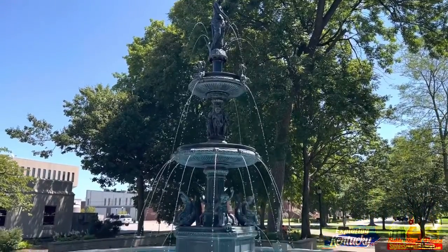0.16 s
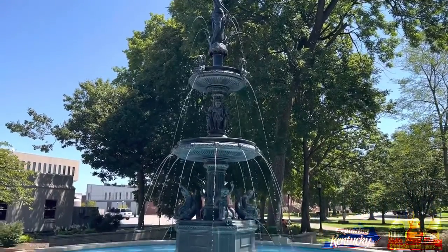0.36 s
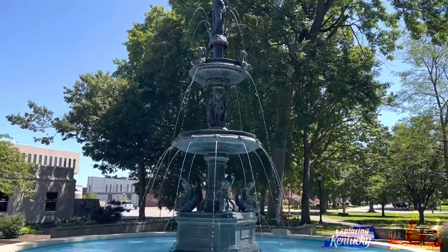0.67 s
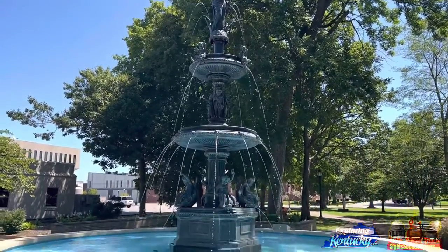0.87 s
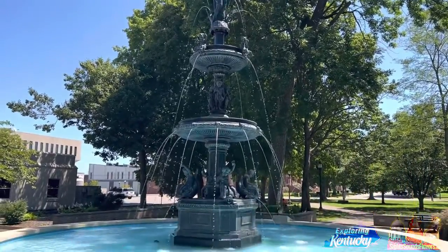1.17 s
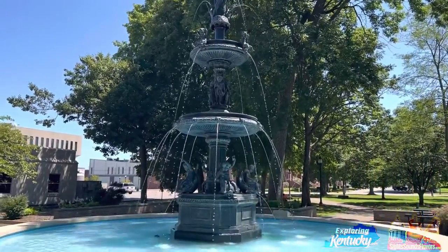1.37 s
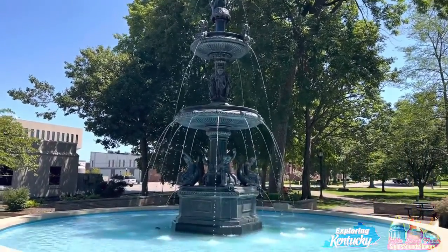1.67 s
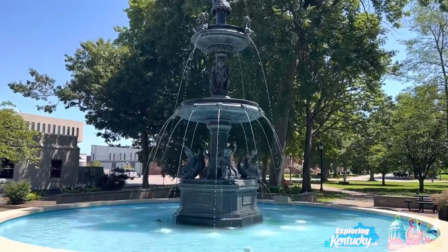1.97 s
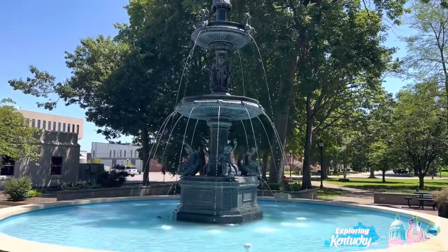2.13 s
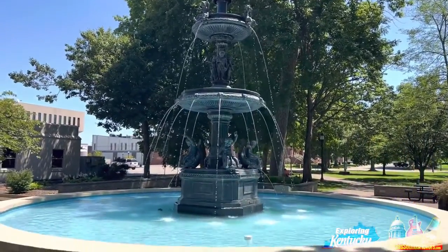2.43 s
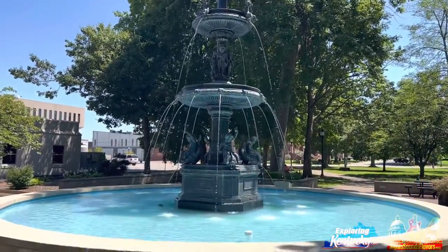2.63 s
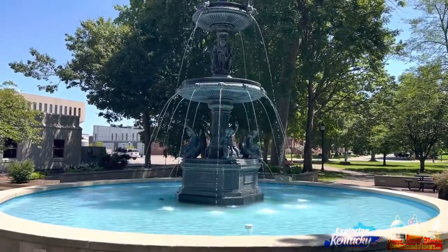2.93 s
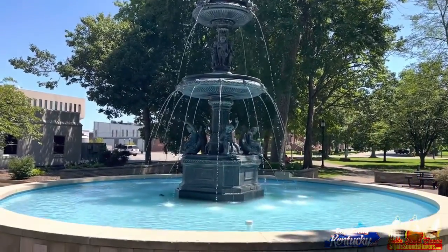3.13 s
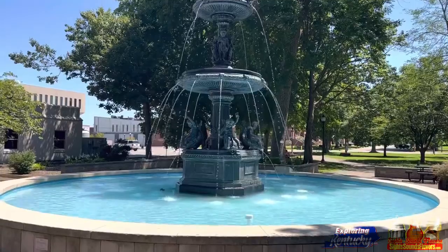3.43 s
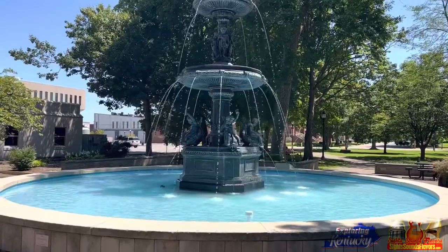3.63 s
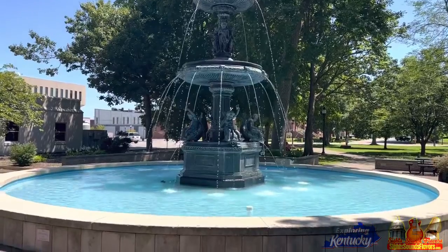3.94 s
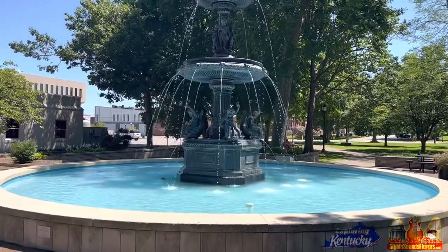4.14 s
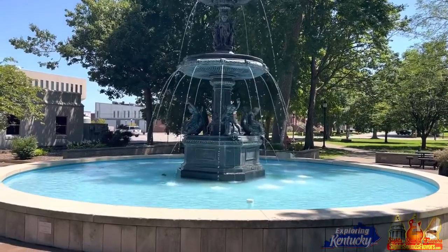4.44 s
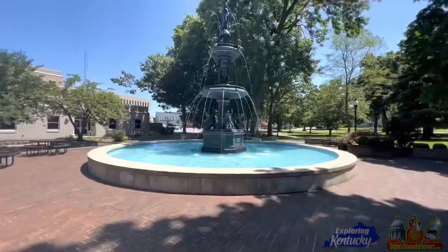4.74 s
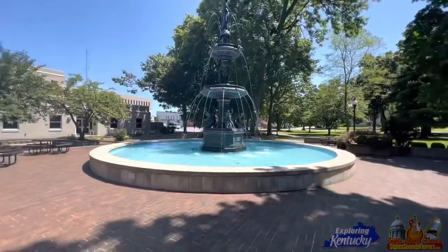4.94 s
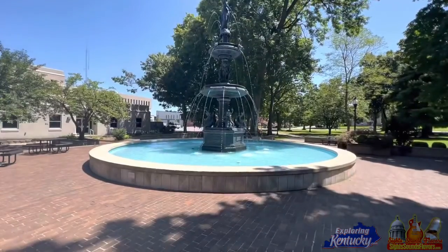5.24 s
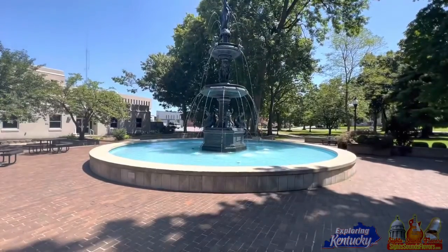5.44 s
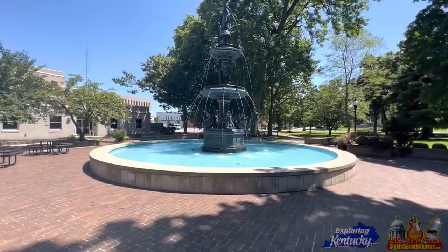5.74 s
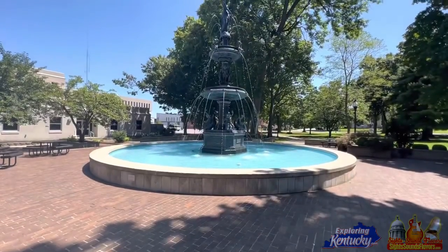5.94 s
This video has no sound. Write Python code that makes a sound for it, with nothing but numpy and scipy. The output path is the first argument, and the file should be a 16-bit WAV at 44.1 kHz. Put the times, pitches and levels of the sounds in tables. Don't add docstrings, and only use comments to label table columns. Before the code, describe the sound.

From 0 seconds a tiered fountain in an open park splashes steadily, heard in stereo a few steps from the pool. Thin jets break into countless drops, making a grainy, fluctuating hiss and patter with drifting fine spray. Nearer drops stand out: bright spits near 0.1 and 0.2, a tick around 0.5, then plops and ticks clustered from 0.8 to 1.4. More plops come near 1.7 and 2.5, a deeper one at 3.3, and a busy run from 3.7 to 4.2 ending in a sharp splash. Far underneath, low road rumble and a stumbling engine idle, clearest around 1 second, stay quiet. At about 4.6 the position shifts quickly further back over paving: the splash is more diffuse, its ground reflection stronger and duller, swelling slightly near 5.4, where a tiny high bubble whistles for an instant. Small ticks crowd the end, around 5.9 to 6.05.

```python
import sys
import numpy as np
from scipy import signal
from scipy.fft import rfft, irfft, next_fast_len
from scipy.io import wavfile
from scipy.ndimage import uniform_filter1d, map_coordinates

SR = 44100
rng = np.random.default_rng(int(sys.argv[2]) if len(sys.argv) > 2 else 0)


def generate_wav(sig):
    pcm = np.round(np.clip(np.atleast_2d(sig).T, -1, 1) * 32767).astype(np.int16)
    wavfile.write(sys.argv[1], SR, pcm)


def voltage_ratio(decibels):
    exponent = np.asarray(decibels, float) / 20
    return 10 ** exponent


N = 269010
TIME = np.arange(N) / SR


def unit(x):
    return x / np.sqrt(np.mean(x ** 2, axis=-1, keepdims=True) + 1e-20)


def along(hz, points, column=1):
    rows = np.transpose(points)
    return np.interp(np.log(hz + 1), np.log(rows[0] + 1), rows[column])


def curves(rows):
    s, *columns = np.transpose(rows)
    return [np.interp(TIME, s, column) for column in columns]


def wobble(rate):
    knots = rng.standard_normal(int(N * rate / SR) + 4)
    return map_coordinates(knots, [np.arange(N) * rate / SR])


def bumps(times, rise_s, fall_s):
    t = TIME - np.asarray(times)[:, None]
    return np.exp(-(t / np.where(t < 0, rise_s, fall_s)) ** 2)


def filtered(x, response):
    m = next_fast_len(N + 8192)
    hz = np.fft.rfftfreq(m, 1 / SR)
    return irfft(rfft(x, m) * response(hz), m)[..., :N]


def bubbles(s, db, hz, cycles, rise):
    length = 320
    turns = np.arange(length) / SR * hz[:, None]
    life = turns / cycles[:, None]
    attack = np.minimum(3 * turns, 1)
    fade = np.cos(np.linspace(0, np.pi / 2, length))
    ring = np.sin(2 * np.pi * turns * (1 + rise * life / 2))
    shape = -attack * np.exp(-life) * fade * ring
    at = np.round(s * SR).astype(int)[:, None] + np.arange(length)
    return np.bincount(at.ravel(), (voltage_ratio(db)[:, None] * shape).ravel(), N + length)[:N]


def patter(surge, spread_db, drops_db, count):
    s, pitch, size, life = rng.random((count, 4)).T
    crowd = np.cumsum(voltage_ratio(2.8 * surge))
    s = np.interp(s, crowd / crowd[-1], TIME)
    hz = 450 * 33 ** pitch
    db = -spread_db * np.log(size + 0.061) + 16.8 * np.log10(hz / 1000)
    drops = bubbles(s, db, hz, 1.1 + 4.5 * life ** 2, rise=.12)
    z = signal.stft(rng.standard_normal(N), nperseg=256)[2]
    grain = uniform_filter1d(rng.standard_normal(z.shape), 5, 0)
    grain = uniform_filter1d(grain, 6, 1)
    hiss = signal.istft(z * voltage_ratio(2.05 * grain / grain.std()), nperseg=256)[1][:N]
    return unit(voltage_ratio(0.56 * surge) * unit(hiss) + voltage_ratio(drops_db) * unit(drops))


def bounce(hz, delay, gain, turn, dull_hz):
    echo = gain / (1 + (hz / dull_hz) ** 2) * np.exp(-1j * (2 * np.pi * hz * delay - turn))
    return (1 + echo) / np.sqrt(1 + abs(echo) ** 2)


def ahead(hz, lead):
    first_hz, every_hz, width_hz = 9350, 1800, 700
    flips = sum(np.clip((hz - first_hz - k * every_hz) / width_hz + .5, 0, 1) for k in range(4))
    return np.interp(hz, *np.transpose(lead)) + np.pi * flips


def heard(axis, flanks, colour, alike, phases, ground):
    def tone(hz):
        ports_db = [along(hz, colour, column=1), along(hz, colour, column=2)]
        return voltage_ratio(ports_db) * hz ** 2 / (hz ** 2 + 190 ** 2)

    def share(hz):
        return np.clip(along(hz, alike), 0, 1)

    def axis_path(hz):
        lead = np.exp(.5j * np.outer([-1, 1], ahead(hz, phases)))
        return tone(hz) * np.sqrt(share(hz)) * lead * bounce(hz, *ground[0])

    def flank_path(hz):
        return tone(hz) * np.sqrt(1 - share(hz)) * bounce(hz, *ground[1])

    return filtered(axis, axis_path) + filtered(flanks, flank_path)


# frequency in Hz, left level in dB, right level in dB.
NEAR_COLOUR = [(186, -4.5, -14.5), (312, -3, -2.5), (630, -1.1, -3), (1230, -1.65, -4), (2200, -2.5, -2.5),
               (2910, -6, -10.5), (3830, -10.5, -10), (4560, -12.5, -16), (5860, -12, -21),
               (7400, -16.5, -21), (8400, -16.5, -18), (11470, -18.5, -18), (12900, -24.5, -26.5),
               (15800, -28, -25.5)]
# frequency in Hz, share of power from the axis [0 to 1].
NEAR_SHARE = [(300, 0.93), (1500, 0.87), (2800, 0.59), (4000, 0.49), (5500, 0.22), (7300, 0.15),
              (8400, 0.9), (9200, 0.61), (9900, 1), (12500, 0.5), (13800, 0.73), (16000, .88)]
# frequency in Hz, phase in radians.
NEAR_LEAD = [(0, 0), (2000, 0), (2750, -1.6), (3200, .3), (4000, -.5), (5300, 1.1), (7200, 0), (8000, -.2)]
# delay in seconds, gain as a ratio (or one per port), turn in radians, dull above Hz.
NEAR_ECHO = [
    (.0021, .33, 2.7, 4000),
    (.00207, [[.5], [.15]], 4.93, 9000),
]


def water_near(axis, flanks):
    return heard(axis, flanks, NEAR_COLOUR, NEAR_SHARE, NEAR_LEAD, NEAR_ECHO)


# frequency in Hz, left level in dB, right level in dB.
FAR_COLOUR = [(200, 2, 0.5), (340, 1.5, -5), (556, -3, -4), (1010, 0.7, -3.5), (1970, 0, -3),
              (2780, -2.5, -10), (3900, -7.0, -7), (4350, -9.5, -14), (6350, -10, -23.5), (7700, -11, -19),
              (8400, -15, -20), (11340, -18, -16), (13000, -24.5, -28), (15700, -33.0, -28)]
# frequency in Hz, share of power from the axis [0 to 1].
FAR_SHARE = [(500, 0.74), (1500, 0.46), (2800, 0.088), (4000, 0.45), (5200, 0.31), (6500, 0.31),
             (8500, 0.4), (10200, 0.8), (12000, 0.94), (13700, 0.27), (16000, .9)]
# frequency in Hz, phase in radians.
FAR_PHASE = [(0, 0), (2050, -.1), (2700, -1.2), (3500, -.6), (4050, -.2), (5100, -2.6), (6300, -1),
             (8000, 0)]
# delay in seconds, gain as a ratio, turn in radians, dull above Hz.
FAR_ECHO = [
    (.00194, .88, 1.25, 2100),
    (.00194, .45, 1.25, 1800),
]


def water_far(axis, flanks):
    return heard(axis, flanks, FAR_COLOUR, FAR_SHARE, FAR_PHASE, FAR_ECHO)


# time in seconds, level in dB.
WATER_FLOW = [
    (0, -36),
    (.8, -35.5),
    (2.2, -35.5),
    (3.5, -36),
    (3.9, -35.5),
    (4.5, -35.5),
    (5.4, -34),
    (6.1, -35.5),
]
# time in seconds, swell in dB.
SLUGS = [(.76, 1.5), (1.03, 1.5), (1.19, 0.5), (1.25, 0.5), (2.05, 1.5), (2.41, 1), (2.51, 0.5), (2.6, 0),
         (3.19, 2.5), (3.69, 1.5), (3.92, 0), (4.195, 4), (4.66, 2.5), (4.76, 1.5), (4.88, 3.5),
         (5.16, 0.5), (5.46, 1), (5.83, 3), (5.91, 1.5), (6.04, 0.5)]


def fountain():
    surge = .4 * wobble(14) + .7 * wobble(32) + .5 * wobble(80)
    axis = patter(surge, spread_db=3.0, drops_db=-7.5, count=7000)
    flanks = np.array([patter(surge, spread_db=3.0, drops_db=-4.5, count=4000) * voltage_ratio(1.23 * wobble(35))
                       for port in "LR"])
    near, far = water_near(axis, flanks), water_far(axis, flanks)
    scene_change_s, change_s = 4.57, .1
    back = np.clip((TIME - scene_change_s) / change_s, 0, 1)
    water = (1 - back) * near / np.std(near) + back * far / np.std(far)
    mist = filtered(water, lambda hz: 1 / (1 + (12600 / (hz + 1)) ** 16))
    gusts = voltage_ratio(1.6 * wobble(7) + 1.8 * wobble(22) - .6)
    water = water + (gusts - 1) * mist
    s, swell_db = np.transpose(SLUGS)
    swells = swell_db @ bumps(s, rise_s=0.0071, fall_s=0.018)
    return voltage_ratio(curves(WATER_FLOW)[0] + swells + 2.5) * water


# time in seconds, rumble level in dB, idling engine level in dB.
DISTANT_LEVELS = [(0, -38.5, -47), (.6, -36, -52), (.8, -38.5, -38), (1.3, -36, -38), (2.2, -37.5, -41),
                  (2.6, -36.5, -41.5), (2.95, -38, -38.5), (3.25, -36, -52), (4.35, -37.5, -47),
                  (4.6, -37.5, -55), (5.5, -39, -49), (6.1, -39.5, -54)]
# frequency in Hz, level in dB per Hz.
ROAD_SPECTRUM = [(15, -56), (25, -26), (35, -8), (39, -20), (65, 1.5), (79, 0), (92, -7.5), (118, -2.5),
                 (165, -1), (194, -10.5), (281, -16.5), (309, -23), (330, -17.5), (430, -24), (730, -120)]
# multiple of the firing rate, level in dB.
ENGINE_ORDERS = [
    (1, -0.5),
    (2, -4),
    (3, -8),
]
STUMBLES = [.37, .52, .88, 1.38, 1.58, 2.19, 2.34, 2.49, 3.24, 3.76, 4.12, 4.5, 4.81, 5.43, 5.91]


def traffic():
    rumble_db, engine_db = curves(DISTANT_LEVELS)
    stumble_db, stumble_s = -14.5, 0.041
    engine_db = engine_db + stumble_db * bumps(STUMBLES, stumble_s, stumble_s).sum(axis=0)
    noise = filtered(rng.standard_normal((2, N)), lambda hz: voltage_ratio(along(hz, ROAD_SPECTRUM)))
    mid = noise[0]
    side = filtered(noise[1], lambda hz: 0.13 + 0.58 / (1 + (hz / 90) ** 4))
    road = voltage_ratio(rumble_db + 0.99 * wobble(6.12)) * unit(np.array([mid + side, mid - side]))
    firing_hz = 50 + 1.096 * wobble(3) + 1.186 * wobble(16)
    turns = np.cumsum(firing_hz) / SR
    engine = sum(voltage_ratio(db + 1.2 * wobble(16)) * np.sin(2 * np.pi * k * turns) for k, db in ENGINE_ORDERS)
    ports_db = np.array([[-.6], [.6]])
    return road + voltage_ratio(engine_db + 3.0 + ports_db) * engine


def splash(rows, cycles, spray_db, spray_s):
    s, db, hz, pan_db = np.transpose(rows)
    grains = 7
    jitter, tone = rng.random((len(s), 2, grains)).transpose(1, 0, 2)
    spray_at = (s[:, None] + spray_s * (jitter - .15)).ravel()
    spray_hz = (hz[:, None] * 1.96 ** (tone - .5)).ravel()
    ringing = cycles * (1500 / hz) ** 0.33
    ports = []
    for side in (.5, -.5):
        level = db + side * pan_db
        bubble = bubbles(s + .0006, level + 0.5, hz, ringing, rise=0.046)
        smack = bubbles(s + .0006, level - 1, 2.2 * hz, .7 + 0 * s, rise=0)
        puff_db = np.repeat(level + spray_db, grains)
        spray = bubbles(spray_at, puff_db, spray_hz, 1.37 + 0 * spray_at, rise=0.085)
        ports.append(smack + bubble + spray)
    return np.array(ports)


# time in seconds, peak in dB, bubble pitch in Hz, left over right in dB.
SPIT_DROPS = [(0.1104, -31, 6790, 5), (0.216, -27.5, 6190, 10), (1.7531, -32, 10500, 2.0),
              (2.7477, -28, 8250, 1.0), (3.6654, -37, 6780, 2.0), (3.9205, -28, 9000, 2),
              (3.9424, -31, 7290, 6), (4.2383, -36, 6150, 1.5), (4.9954, -29, 11100, 8),
              (5.196, -31, 12000, 2), (5.2354, -51.5, 6880, 5.0), (5.3254, -41, 6830, 7.0),
              (5.427, -31, 7120, 0), (5.7184, -32, 7230, 6.0)]


def spits():
    return splash(SPIT_DROPS, 3.5, spray_db=-3, spray_s=.007)


# time in seconds, peak in dB, bubble pitch in Hz, left over right in dB.
TICK_DROPS = [(0.169, -21.5, 2270, 2.0), (0.4654, -42, 2600, 7), (1.069, -24, 2720, 5),
              (1.2444, -21, 2370, 1.5), (1.3159, -17, 2250, 5), (2.5082, -21, 2640, 12),
              (3.7544, -20.5, 2410, 4), (3.921, -18, 2420, 1), (3.9275, -27, 2300, 2),
              (4.1864, -29, 2300, 1), (4.7491, -24, 3780, 6), (4.8439, -26, 2400, 15),
              (5.0704, -30, 2210, 5.5), (5.1382, -23, 2240, 5.0), (5.395, -38, 2520, 4.5),
              (5.8254, -35, 3490, 7), (5.891, -21, 2370, 7), (5.9479, -27, 2330, 10),
              (5.9954, -23, 2200, 4), (6.0367, -23.5, 2910, 13), (6.0407, -17, 2520, 10)]


def ticks():
    return splash(TICK_DROPS, 1.8, spray_db=-4, spray_s=.008)


# time in seconds, peak in dB, bubble pitch in Hz, left over right in dB.
PLOP_DROPS = [(0.293, -24.5, 656, 1.0), (0.762, -20, 1500, 0.0), (0.822, -19, 1680, 7),
              (1.186, -20, 2000, -1), (1.283, -18, 1470, 3), (1.367, -15.5, 1920, 0.0),
              (1.7345, -21, 1600, 1.5), (2.416, -16, 1680, 0), (2.435, -24, 795, 2.5),
              (2.448, -36, 620, 2.0), (2.596, -17, 1320, 1.0), (3.3343, -16, 705, 3), (3.528, -23, 1440, 3),
              (3.687, -17, 1720, 1), (3.796, -18, 1270, 1.5), (4.115, -19, 1660, 8),
              (4.192, -14, 2320, 1.5), (4.422, -25, 1050, -1), (5.016, -18, 1680, 2),
              (5.155, -20, 1750, 4.0)]


def plops():
    return splash(PLOP_DROPS, 1.6, spray_db=-14, spray_s=.012)


# start in seconds, level in dB, start pitch in Hz, end pitch in Hz,
# length in seconds, left over right in dB.
SINGING_BUBBLE = (5.399, -34, 7350, 7600, .014, 8)


def whistle():
    s, db, start_hz, end_hz, length, pan_db = SINGING_BUBBLE
    u = np.clip((TIME - s) / length, 0, 1)
    hz = start_hz + (end_hz - start_hz) * np.sqrt(u)
    tone = np.sin(np.pi * u) ** 1.7 * np.sin(2 * np.pi * np.cumsum(hz) / SR)
    return voltage_ratio(db + np.array([[.5], [-.5]]) * pan_db) * tone


def scene():
    return fountain() + traffic() + spits() + ticks() + plops() + whistle()


def low_pass(x):
    return signal.sosfilt(signal.butter(12, 17000, fs=SR, output="sos"), x)


def record(dry):
    top_hz = 15790
    return low_pass(filtered(dry, lambda hz: hz < top_hz))


dry = scene()
out = record(dry)
generate_wav(out)
```